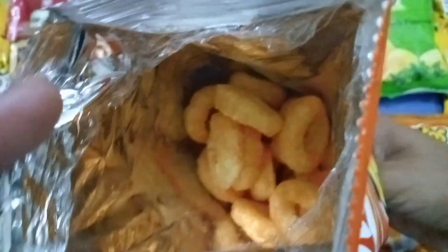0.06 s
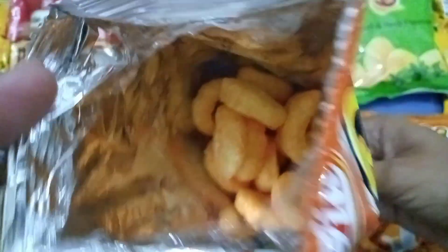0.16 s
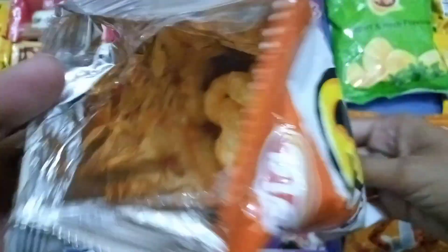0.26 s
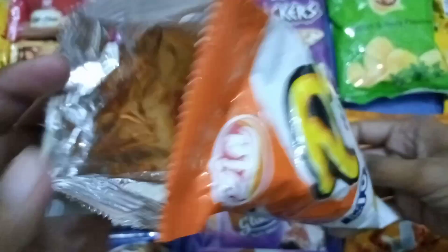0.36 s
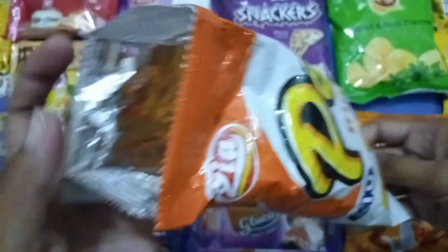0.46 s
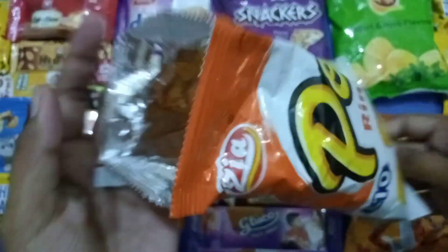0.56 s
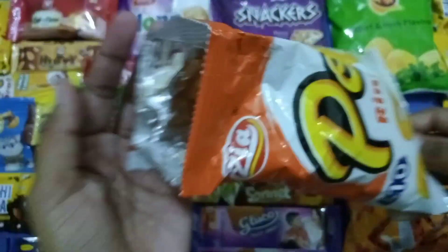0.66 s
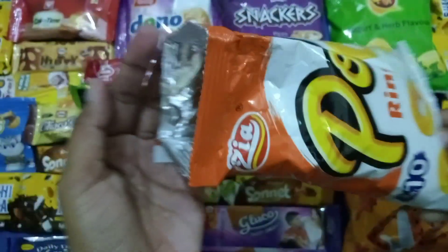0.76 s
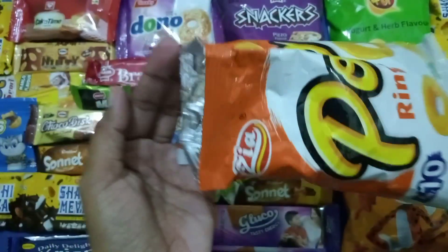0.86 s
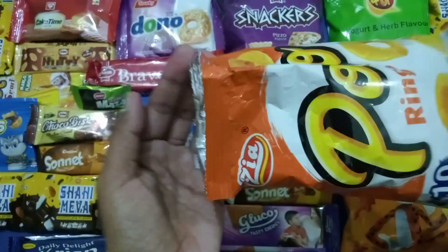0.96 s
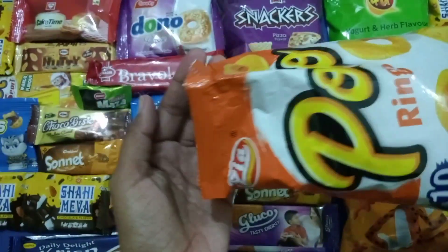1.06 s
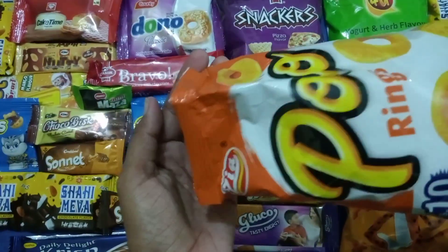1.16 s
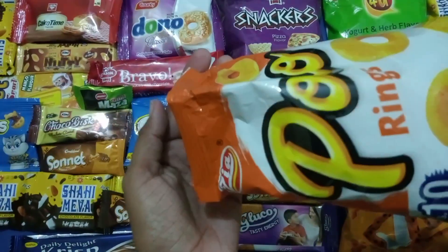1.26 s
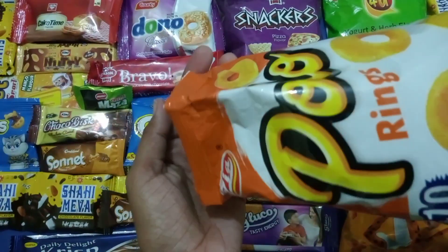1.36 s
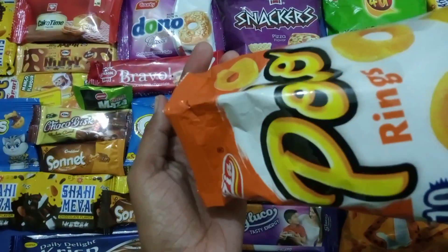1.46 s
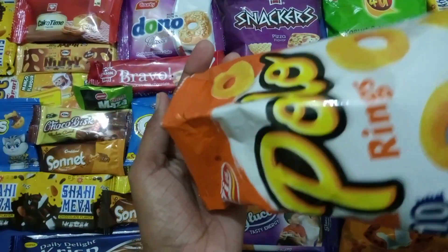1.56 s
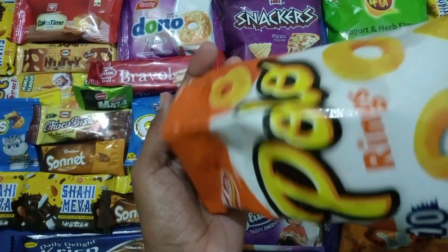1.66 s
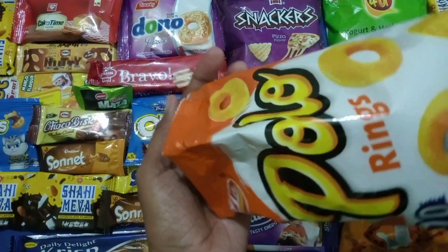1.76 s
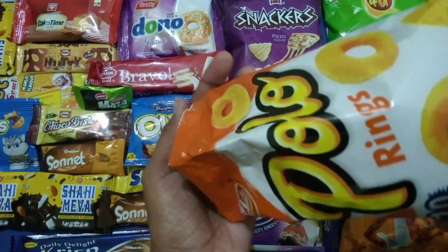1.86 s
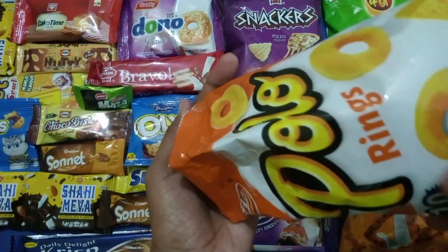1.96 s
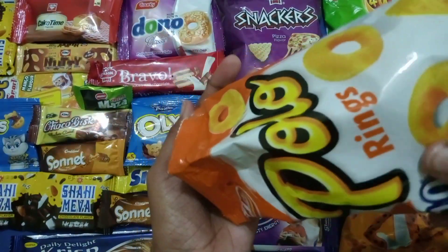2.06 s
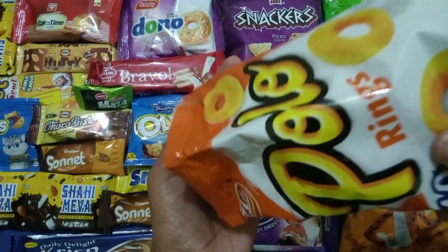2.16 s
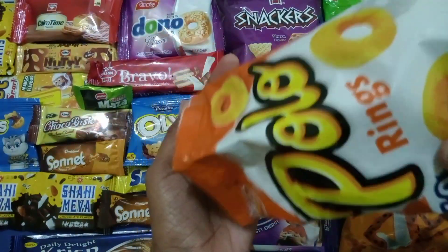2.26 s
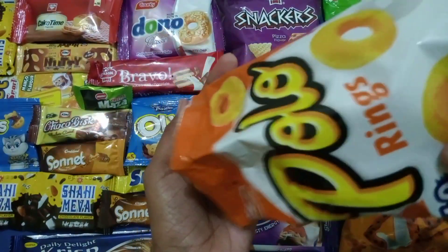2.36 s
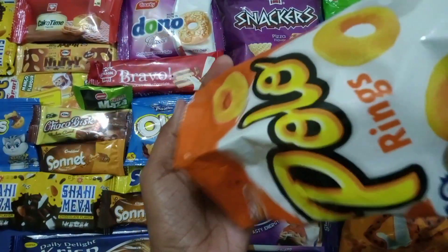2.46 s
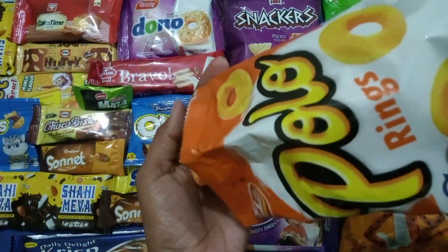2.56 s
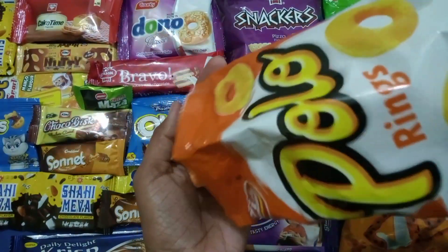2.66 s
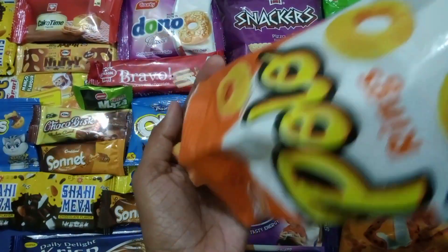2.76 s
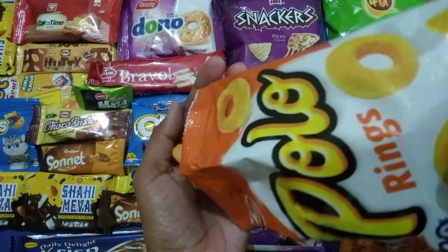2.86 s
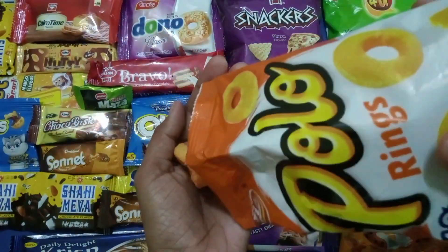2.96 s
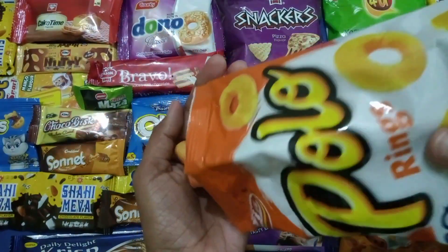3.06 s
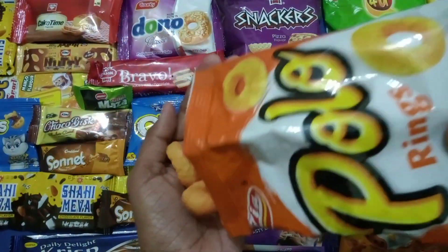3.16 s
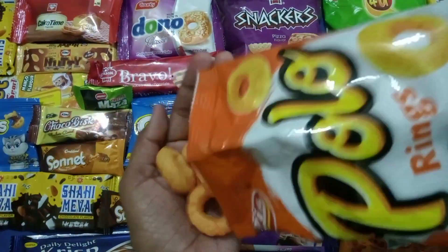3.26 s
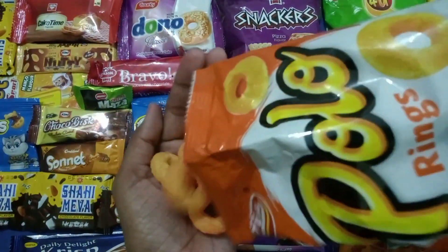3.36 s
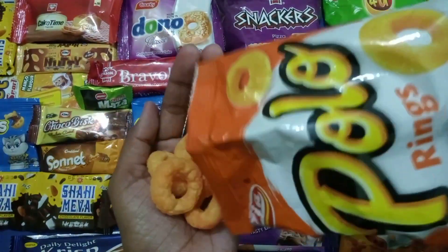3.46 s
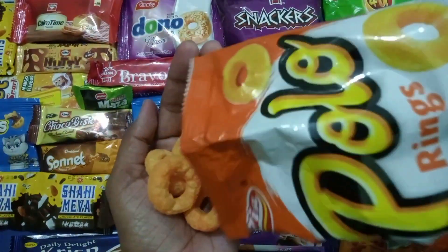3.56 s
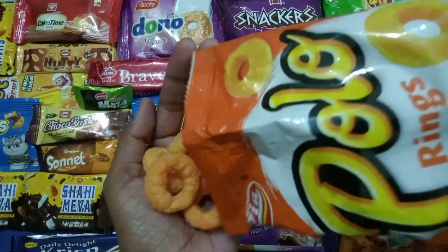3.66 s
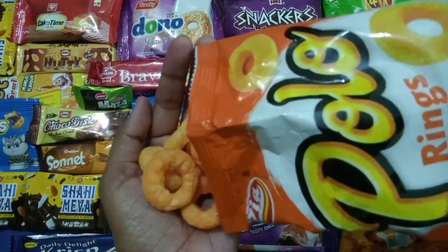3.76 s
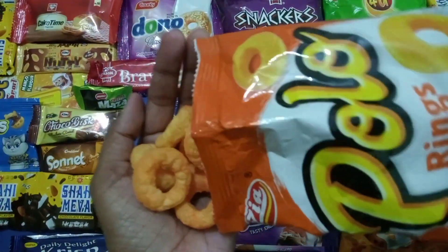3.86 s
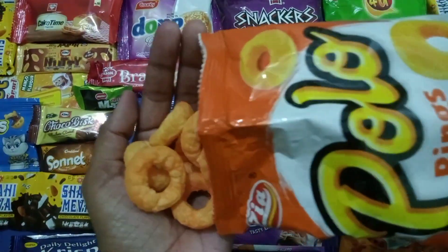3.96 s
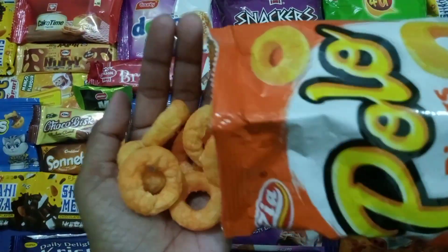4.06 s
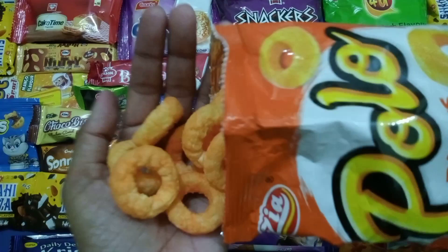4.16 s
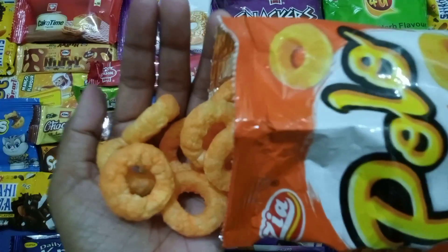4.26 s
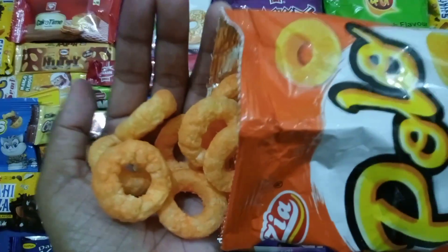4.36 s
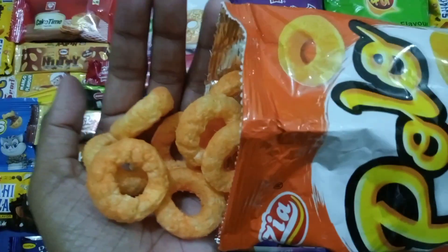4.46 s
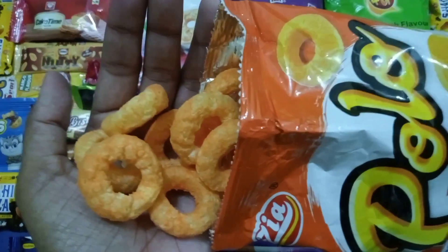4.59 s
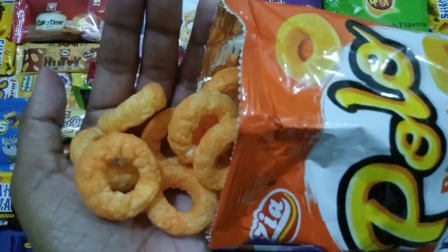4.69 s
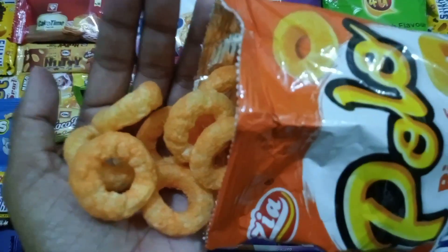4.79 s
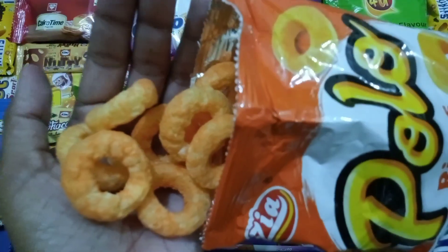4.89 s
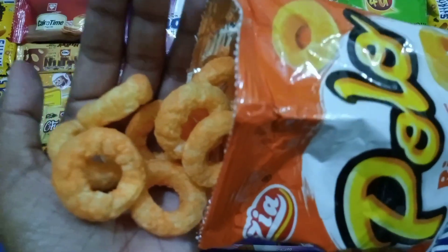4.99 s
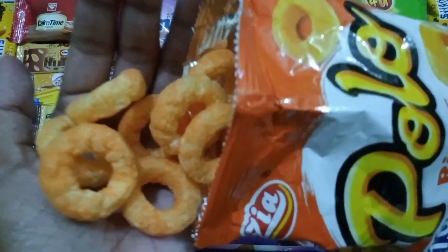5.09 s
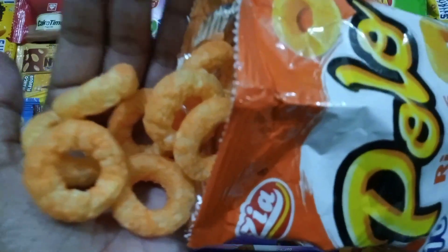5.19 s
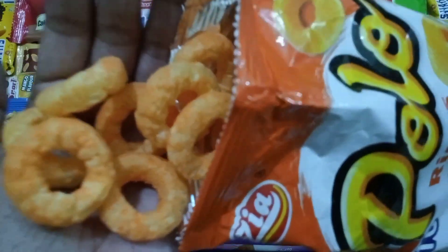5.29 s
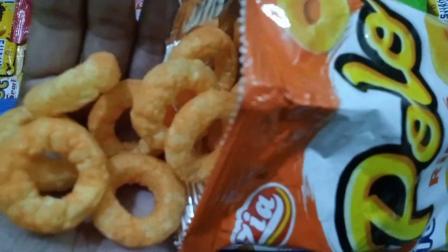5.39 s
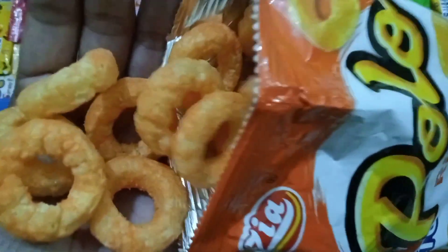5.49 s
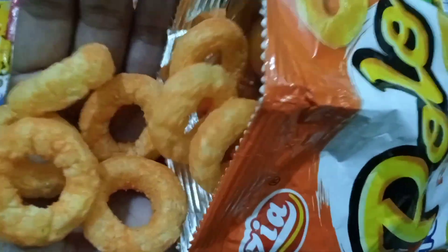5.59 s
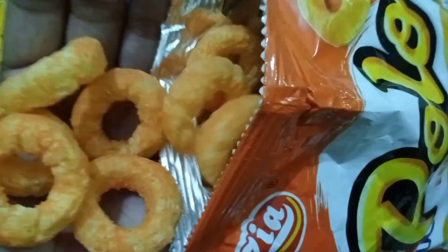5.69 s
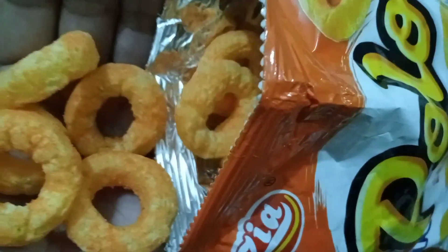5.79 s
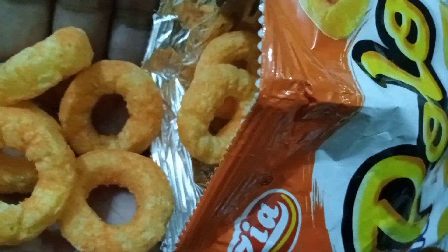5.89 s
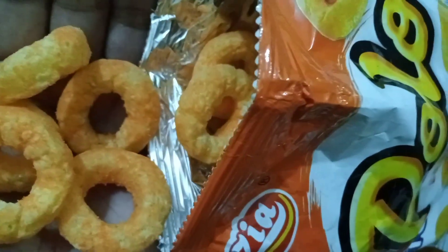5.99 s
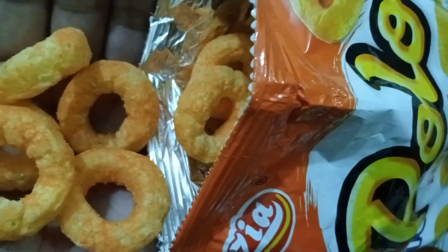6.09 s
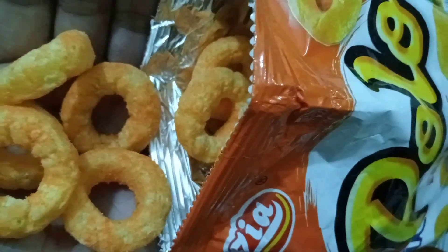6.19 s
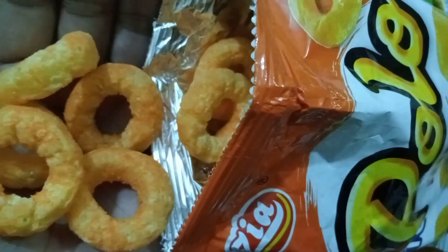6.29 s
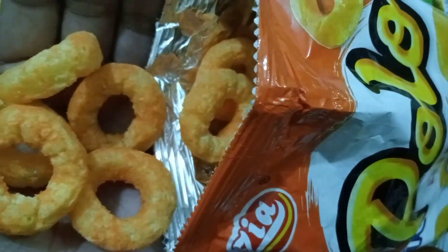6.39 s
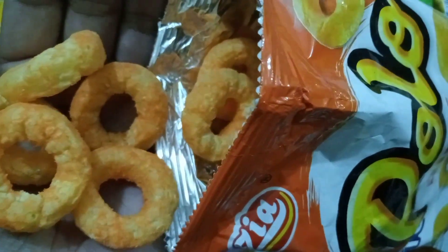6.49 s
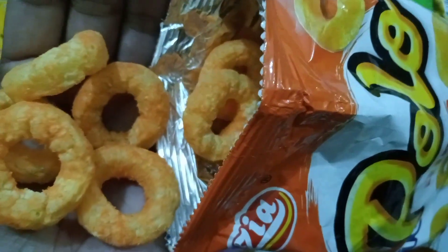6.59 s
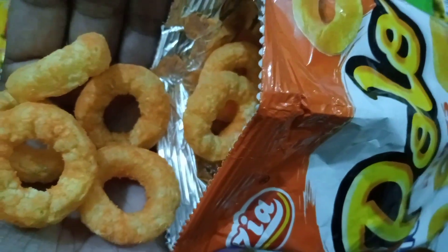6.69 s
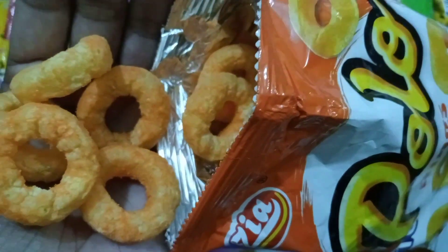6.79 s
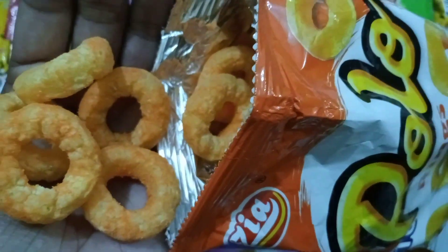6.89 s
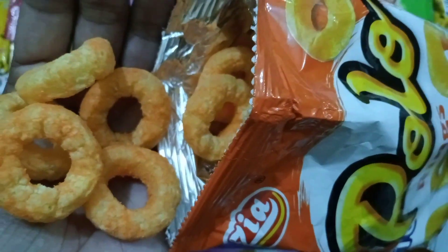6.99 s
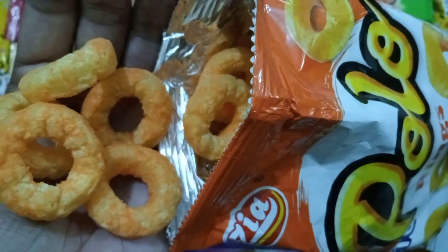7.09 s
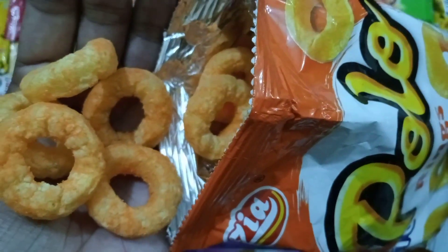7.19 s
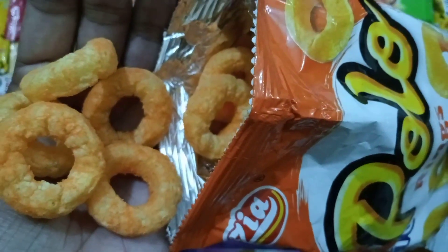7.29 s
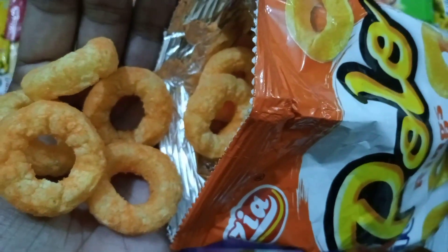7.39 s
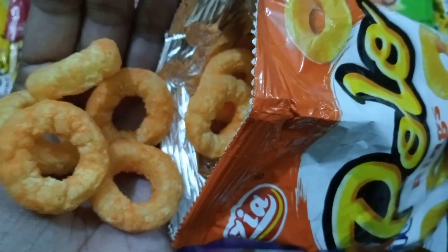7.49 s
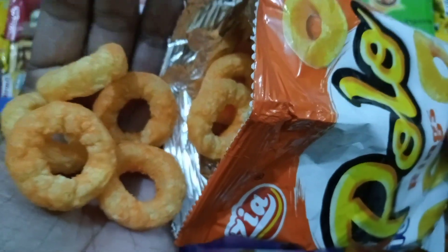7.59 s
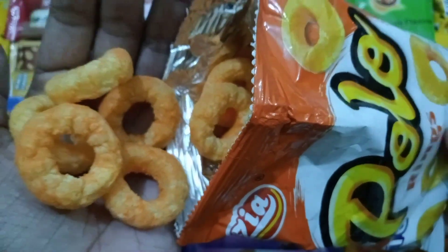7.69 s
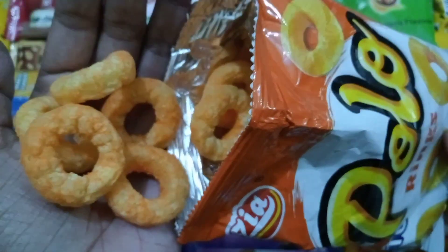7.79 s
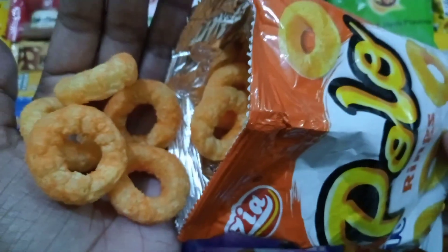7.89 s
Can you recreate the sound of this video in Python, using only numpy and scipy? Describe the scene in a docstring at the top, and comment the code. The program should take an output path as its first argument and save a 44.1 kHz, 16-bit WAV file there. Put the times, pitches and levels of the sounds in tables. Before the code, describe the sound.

Hands crinkle and shake a foil-lined snack packet close by, sharp film snaps and crackles thickening, then thinning into a soft slide over low room rumble.

```python
"""Over a faint rumble and drone, hands work a foil-lined snack packet close by in a small room.
Small folds crackle over a fine crinkle, then creases snap as the film buckles; the hollow pouch colours them.
Each squeeze builds, holds and lets go, driving the crinkle and a soft rumble of skin; early on a low hum swells.
Film and corn rings then hiss as they slide, briefly at first; two faint squeaks follow, and a longer slide.
Snaps are noise bursts through resonances, crinkle is many decaying sines, the hum is a filtered pulse train."""
import sys
import numpy as np
from scipy import signal
from scipy.fft import rfft, irfft
from scipy.io import wavfile
from scipy.ndimage import map_coordinates

SR = 44100
rng = np.random.default_rng(int(sys.argv[2]) if len(sys.argv) > 2 else 0)


def master(y):
    """Save y as 16-bit WAV."""
    cut = np.clip(np.atleast_2d(y).T, -1, 1)
    pcm = np.round(cut * 32767)  # scale
    wavfile.write(sys.argv[1], SR, pcm.astype(np.int16))


N = 350154

# room's low rumble and drone, gain over time: [t/s, level/dB]
RUMBLE_GAIN = [(.15, -7), (.35, -4), (5.1, 3), (6.25, -1), (7.1, 1.5), (7.33, -5.5), (7.55, 4.5)]
# spectral shape of the steady background: [f/Hz, relative density/dB per Hz]
FLOOR_SPECTRUM = [(20, -22), (65, 5), (95, -4.5), (140, 8), (220, -3.5), (600, -8), (1400, -19),
                  (2300, -13), (3600, -16), (6000, -33.5), (8200, -36), (9500, -28), (11500, -38),
                  (16000, -38.5)]
# partials of the wavering drone: [mean f/Hz, relative level/dB]
DRONE_PARTIALS = [(68, -75.5), (130, -77), (175, -78)]
# light handling between squeezes: [t/s, relative level/dB]
GRIP_LEVEL = [(.14, -93), (.28, -60.5), (1.1, -60), (1.6, -59), (2.7, -53.5), (3.9, -51.5), (4.45, -73),
              (5.5, -73.5), (5.68, -57.5), (5.88, -56.5), (6.22, -89.5)]
# squeezes and shakes: [start t/s, length t/s, relative crinkle level/dB, relative skin rumble level/dB]
SQUEEZE_EVENTS = [(0.319, 0.08, -47.5, -51.5), (0.462, .13, -46.5, -80), (0.745, 0.12, -53, -59.5),
                  (1.377, 0.039, -50, -55.5), (1.489, 0.14, -49.5, -49), (1.718, 0.15, -48.5, -68),
                  (2.147, 0.069, -37.5, -50), (2.375, 0.064, -39, -51), (2.561, 0.1, -44, -53),
                  (2.875, 0.045, -38, -45), (3.123, 0.12, -41.5, -46), (3.402, .21, -46.5, -50.5),
                  (3.76, 0.05, -52.5, -49), (3.905, .06, -40.5, -46.5), (3.974, .02, -54, -46),
                  (4.266, 0.11, -55.5, -77), (4.54, 0.19, -63, -69), (5.357, 0.1, -61, -70),
                  (5.697, 0.12, -50, -54), (5.945, 0.045, -57, -48.5), (7.443, .15, -82.5, -66.5)]
# spectral shape of skin rubbing on the packet: [f/Hz, relative density/dB per Hz]
SKIN_SPECTRUM = [(20, -29.5), (60, -10), (95, -4.5), (150, -0.5), (230, -4), (450, -5), (900, -34.5),
                 (3000, -62)]
# spectral shape of the film: [f/Hz, relative density/dB per Hz]
FILM_SPECTRUM = [(55, -36.5), (150, -8), (550, -6.5), (780, 0.5), (1100, -6), (1500, -5.5), (1900, -1),
                 (2800, -4.5), (3900, -4), (5200, -14.5), (6800, -17), (8300, -14.5), (9600, -7.5),
                 (12000, -18.5), (16000, -26.5)]
# treble of the crinkle over time: [t/s, relative level/dB]
TREBLE_LEVEL = [(0.2, -6), (0.76, -31), (1.2, -10.5), (2.24, -11), (3.98, -20.5), (4.79, -13), (5.47, -9.5),
                (6.2, -22.5)]
# film sliding instead of buckling: [t/s, relative hiss gain/1]
SLIDE_GAIN = [(2.85, .39), (2.9, 1.4), (2.98, .39), (5.5, 0.39), (5.62, 1.5), (5.97, 0.9)]
# small folds that give way facet by facet: [t/s, relative level/dB]
FOLD_EVENTS = [(0.2034, -55), (0.2442, -53.5), (0.289, -44), (0.3125, -36), (0.3866, -38), (0.4155, -45),
               (0.4592, -48), (0.4896, -41), (0.6413, -47), (0.736, -48), (0.7634, -46), (0.8495, -46),
               (1.2096, -43.5), (1.4215, -45), (1.744, -40), (1.8261, -45), (1.9289, -39), (1.947, -38.5),
               (2.1371, -31), (2.1555, -34.5), (2.1684, -35.5), (2.1797, -33), (2.1896, -32),
               (2.2849, -39.5), (2.357, -43), (2.3828, -39.5), (2.4224, -32.5), (2.5963, -47), (2.827, -44),
               (2.8479, -36), (2.8908, -45), (3.08, -33), (3.1043, -34.5), (3.1185, -42), (3.1502, -40),
               (3.163, -29.5), (3.176, -33), (3.1826, -30.5), (3.2014, -30), (3.221, -33), (3.2355, -31),
               (3.312, -43.5), (3.393, -35), (3.415, -37.5), (3.4536, -34.5), (3.4817, -49), (3.4961, -35),
               (3.5315, -36), (3.537, -34), (3.6214, -44), (3.6864, -42), (3.8264, -45.5), (3.8737, -40.5),
               (3.8863, -40), (3.9006, -40), (3.9313, -31), (3.953, -36), (3.9601, -32), (4.0037, -43.5),
               (4.0922, -40.5), (4.1441, -51.5), (4.836, -41), (5.1192, -54.5), (5.2243, -53.5),
               (5.3625, -42.5), (5.719, -67), (5.7498, -43.5), (5.955, -44.5), (6.1457, -57.5),
               (7.869, -45.5)]
# buckling creases: [t/s, relative level/dB, panel f/Hz, relative pouch level/dB, relative tick level/dB]
CREASE_EVENTS = [(0.335, -33, 2526, -4.5, -10), (0.3584, -29, 2367, -12, -1), (0.515, -31, 2960, -17, 6.5),
                 (0.532, -35, 2914, -6.5, -5), (0.5715, -35, 2360, -2.5, -29),
                 (0.602, -41, 2900, -2.5, -33), (0.723, -43.5, 3950, -13, -8), (0.831, -63, 2640, -4, 18.5),
                 (0.9401, -38.5, 2800, 3, -19.5), (1.0092, -42.5, 3260, -12, 0.5),
                 (1.1614, -45.5, 3150, -12, 1.5), (1.2207, -28, 3280, -13.5, -6),
                 (1.4398, -33, 3600, -12, -13), (1.5011, -30, 3000, -6.5, -12),
                 (1.5391, -44.5, 2280, 4, -26), (1.6336, -33.5, 2420, 0.5, -24),
                 (1.6453, -40.5, 2180, 4, -33), (1.7927, -35, 2630, -7, -2.5),
                 (1.8611, -33, 2750, -4.5, -3.5), (1.8668, -32, 3270, 1, -11),
                 (1.9904, -32.5, 2450, -10, -28), (2.0497, -43.5, 2280, 4, -23),
                 (2.0789, -24, 2620, -15.5, -14), (2.1314, -32, 2600, -2.5, -27),
                 (2.1492, -32, 2222, -0.5, -33), (2.2046, -25, 2950, -5, -12),
                 (2.217, -28, 2310, -11, -3.5), (2.488, -29, 2860, 2, -15.5),
                 (2.523, -38, 2890.0, 3.5, -11), (2.633, -24.5, 3130, -13, -5.5),
                 (2.8307, -30.5, 2520, -3.5, 2), (2.8401, -33, 3370, -10, -2), (2.933, -34, 1900, 2, -6.5),
                 (3.0544, -30, 2270, -3, -12), (3.0704, -28.5, 1740, -5, -13.5),
                 (3.214, -23.5, 2730, -14.5, -12), (3.2421, -31.5, 3140, -3.5, -1.5),
                 (3.36, -35.5, 2420, -2, -14), (3.37, -35.5, 3050, -13, -11), (3.73, -38.5, 2570, -11, -10),
                 (3.786, -40.5, 2900, -0.5, 1.5), (3.919, -32.5, 2468, -12, -5),
                 (3.9791, -33.5, 2880, -0.5, -2.5), (4.0616, -36, 2460, 3, -9.5),
                 (4.2494, -35, 3400, -7.5, -6.5), (4.316, -41, 2070, 0.5, -31),
                 (4.523, -40.5, 2950, -3, -24), (4.654, -42, 2460, -3, -22), (4.8237, -39, 2380, -1, -1.5),
                 (4.871, -49.5, 4020, -7.5, -5), (5.0142, -46.5, 2300, -14.5, -20),
                 (5.409, -44.5, 2180, 0.5, -20), (5.95, -46, 2810, 0, -0.5), (5.9932, -54, 2075, 9, -11),
                 (6.04, -46, 2140, 5.5, -15), (6.0509, -41.5, 2400, -16, -14.5),
                 (6.9754, -55, 3620, -8.5, -12), (7.1348, -65, 2980.0, -11.5, -3),
                 (7.3534, -54, 2200, -3, -28), (7.8743, -32.5, 2540, -4, -7), (7.8893, -41, 3270, -2, -9)]
# reverberation of the small room: [f/Hz, time to fall 60 dB t/s]
ROOM_DECAY = [(150, 0.28), (800, 0.45), (3000, 0.53), (9000, 0.4), (15000, 0.88)]
# gliding squeaks: [start t/s, held length t/s, first f/Hz, last f/Hz, amplitude level/dB]
SQUEAK_EVENTS = [(4.37, .05, 3850, 3800, -68.5), (4.59, .058, 3780, 4010, -65)]

TOP_HZ, RUMBLE_HZ = 16000, 260  # upper band limit; edge between rumble and hiss
TIGHTEN_DB_PER_S, RELAX_DB_PER_S = 354.5, 167.5  # how fast a squeeze builds and lets go
POUCH_HZ, TICK_HZ = 1300, 5500  # edges between pouch, panel and tick
UNEVEN_DB = 2.6  # quick unevenness of the fingers' effort
POUCH_LIFE_S, PANEL_LIFE_S, TICK_LIFE_S = 0.001, 0.0007, 0.0005  # decay constants of the crinkle's grains
PANEL_SLIDE_DB = -1  # sliding hiss under the panel's facets
CREASE_SPREAD_DB = 4.5  # scatter of tiny facets in each part of their colour
MINOR_DB, MINOR_SPREAD_DB = -2, 2  # faint crackles: offset from the film's flex, and scatter
FACET_GAP_S, FACET_LOSS_DB = 0.0012, 4  # mean wait and level loss from one flip to the next
HOLLOW_HZ, FACET_HZ, CREASE_HZ = 480, 2800, 9500  # usual pitches: hollow behind a fold, facet, crease tick
FOLD_PITCH_SPREAD = .33  # log scatter of a fold's pitches
FACET_POUCH_DB, FACET_TICK_DB = 6, -6  # mean pouch and tick of a facet re the film's colour
FOLD_POUCH_SPREAD_DB, FOLD_TICK_SPREAD_DB = 3, 2.5  # how folds differ in body and bite
LEAD = 256  # samples of creak before a flip
PANEL_SPLASH, PANEL_Q = 0.2, 8  # a panel's broad share beside its modes; their sharpness
CAVITY_Q = 10  # sharpness of the pouch's air resonance
SLIP_S, SLIP_GROWTH = 0.0017, 0.079  # slip time scale at 0 dB of pouch; its log growth per dB: big creases are slow
HUM_START_S, HUM_LENGTH_S, HUM_DB = 1.49, 0.27, -42  # the hum at full strength
HUM_HZ, HUM_DROP_HZ, HUM_GLIDE_S = 71.3, 22.44, 0.156  # mean final rate; initial excess; glide ending at the start
JUDDER_DB = 4  # unevenness of the hum's pulses


def amp(db):
    """Logarithmic level: decibels become an amplitude ratio."""
    return 10 ** (np.asarray(db) / 20)


def unit(x):
    """Normalization by power: x scaled to rms 1."""
    return x / np.sqrt(np.mean(x ** 2) + 1e-20)


def along(points, hz):
    """Interpolation on a logarithmic frequency axis through (Hz, value) points."""
    f, v = np.transpose(points)
    return np.interp(np.log(hz + 1), np.log(f), v)


def curve(rows):
    """Linear interpolation in time: (s, value) rows as one value per sample."""
    return np.interp(np.arange(N) / SR, *np.transpose(rows))


def wobble(rate):
    """Band-limited fluctuation: a smooth curve through rate random knots a second."""
    knots = rng.standard_normal(int(N * rate / SR) + 4)
    return map_coordinates(knots, [np.arange(N) * rate / SR])


def coloured(x, gain, size=2048):
    """Minimum-phase filtering: x through the causal filter whose magnitude is gain(Hz)."""
    magnitude = np.maximum(gain(np.fft.rfftfreq(size, 1 / SR)), 1e-6)
    cepstrum = irfft(np.log(magnitude))
    # folding the cepstrum forward in time makes the response causal
    cepstrum[1:size // 2] *= 2
    cepstrum[size // 2 + 1:] = 0
    response = irfft(np.exp(rfft(cepstrum)))
    return signal.oaconvolve(x, response)[:len(x)]


def below(hz, edge_hz, order=6):
    """Butterworth low-pass magnitude."""
    return 1 / np.sqrt(1 + (hz / edge_hz) ** (2 * order))


def peak(hz, centre_hz, q):
    """Simple resonance: magnitude near 1 at its centre, narrower for larger q."""
    return 1 / np.sqrt(1 + (q * (hz / centre_hz - centre_hz / (hz + 1))) ** 2)


def swell(start, length, rise, fall):
    """Exponential growth and decay: rise dB/s up to start, a hold of length seconds, then fall dB/s."""
    t = np.arange(N) / SR - start
    return amp(rise * np.minimum(t, 0) - fall * np.maximum(t - length, 0))


def background():
    """Stationary noise and slow modulation: rumble and drone swell together over microphone hiss."""
    drone = np.zeros(N)
    for hz, db in DRONE_PARTIALS:
        level = amp(db + 2.5 * wobble(4))
        wavering_hz = hz * (1 + 0.07 * wobble(2))
        drone += level * np.sin(2 * np.pi * np.cumsum(wavering_hz) / SR)
    noise = coloured(rng.standard_normal(N), lambda hz: amp(along(FLOOR_SPECTRUM, hz)))
    steady = amp(-70.0) * unit(noise)
    rumble = irfft(rfft(steady) * below(np.fft.rfftfreq(N, 1 / SR), RUMBLE_HZ), N)
    hiss = steady - rumble
    return amp(curve(RUMBLE_GAIN)) * (drone + rumble) + hiss


def working():
    """Addition of powers: a light grip plus the squeezes flex the film and rub skin on it."""
    flex_power = amp(curve(GRIP_LEVEL)) ** 2
    rub_power = flex_power.copy()
    for start, length, crinkle_db, rumble_db in SQUEEZE_EVENTS:
        power = swell(start, length, TIGHTEN_DB_PER_S, RELAX_DB_PER_S) ** 2
        flex_power += amp(crinkle_db) ** 2 * power
        rub_power += amp(rumble_db) ** 2 * power
    return np.sqrt(flex_power), np.sqrt(rub_power)


def hands(pressure):
    """Frictional noise: dull uneven rubbing of skin, scaled by pressure."""
    rub = unit(coloured(rng.standard_normal(N), lambda hz: amp(along(SKIN_SPECTRUM, hz))))
    return pressure * amp(-3.5 + 2.8 * wobble(33)) * rub


def film(hz):
    """Spectral division of the film's colour: hollow pouch, ringing panel, sharp tick of the crease."""
    low, high = below(hz, POUCH_HZ) ** 2, below(hz, TICK_HZ) ** 2
    return amp(along(FILM_SPECTRUM, hz)) * np.sqrt([low, (1 - low) * high, 1 - high])


def grains(starts, sizes, centre_hz, spread, life, size=320):
    """Damped free vibration: tiny facets of film ring briefly, each at its own pitch and strength."""
    t = np.arange(size) / SR
    scatter = np.exp(spread * rng.standard_normal((len(starts), 1)))
    hz = np.minimum(centre_hz * scatter, TOP_HZ)
    strength = sizes[:, None] * amp(CREASE_SPREAD_DB * rng.standard_normal(hz.shape))
    polarity = rng.choice([-1, 1], hz.shape)
    rings = strength * polarity * np.sin(2 * np.pi * hz * t) * np.exp(-t / life)
    places = starts[:, None] + np.arange(size)
    return unit(np.bincount(places.ravel(), rings.ravel(), N)[:N])


def crinkle(flex, count=1900, order=3):
    """Random superposition: small creases flip a few facets over the hiss of sliding film and rings."""
    effort = flex * amp(-3.6 + UNEVEN_DB * wobble(110))
    crease_starts = rng.uniform(0, N, (count, 1))
    delays = rng.exponential(0.00088 * SR, (count, order))
    starts = (crease_starts + delays).astype(int).ravel()
    sizes = np.repeat(amp(6.3 * np.minimum(rng.exponential(size=count), 2.6)), order)

    def part(channel, facets, slide_db):
        """Power-weighted mixing of facets and sliding hiss in one part of the film's colour."""
        hiss = amp(slide_db) * curve(SLIDE_GAIN)
        tint = lambda x: unit(coloured(x, lambda hz: film(hz)[channel]))
        return (tint(facets) + hiss * tint(rng.standard_normal(N))) / np.hypot(1, hiss)

    pouch_facets = grains(starts, sizes, centre_hz=667.5, spread=0.45, life=POUCH_LIFE_S)
    pouch = part(0, pouch_facets, slide_db=4.5)
    panel_facets = grains(starts, sizes, centre_hz=2950, spread=.4, life=PANEL_LIFE_S)
    panel = part(1, panel_facets, slide_db=PANEL_SLIDE_DB)
    tick_facets = grains(starts, sizes, centre_hz=9600, spread=0.34, life=TICK_LIFE_S)
    tick = part(2, tick_facets, slide_db=5.0)
    return effort * (amp(-2.5) * pouch + amp(-1.5) * panel + amp(curve(TREBLE_LEVEL) + 3.0) * tick)


def crackle(count=4, size=1024):
    """Successive buckling: a quick run of ever weaker flips, close in pitch, in one fold's body and bite."""
    t, out, start = np.arange(size) / SR, np.zeros(size), 0
    pitch_scatter = np.exp(FOLD_PITCH_SPREAD * rng.standard_normal(3))
    hollow_hz, fold_hz, crease_hz = np.array([HOLLOW_HZ, FACET_HZ, CREASE_HZ]) * pitch_scatter
    body = amp(FACET_POUCH_DB + FOLD_POUCH_SPREAD_DB * rng.standard_normal())
    bite = amp(FACET_TICK_DB + FOLD_TICK_SPREAD_DB * rng.standard_normal())
    for k in range(count):
        detune = np.exp(.1 * rng.standard_normal())
        jolt = unit(rng.standard_normal(size) * np.exp(-t / 0.0005))

        def colour(hz):
            """Resonance of hollow, facet and crease, summed in magnitude."""
            pouch = body * (.5 + peak(hz, hollow_hz * detune, q=3.8))
            panel = .5 + 3 * peak(hz, fold_hz * detune, PANEL_Q)
            tick = bite * (.5 + 2 * peak(hz, crease_hz * detune, PANEL_Q))
            return np.sum(film(hz) * [pouch, panel, tick], axis=0)

        flip = unit(coloured(jolt, colour, size=512))
        out[start:] += amp(-FACET_LOSS_DB * k) * flip[:size - start]
        start += round(FACET_GAP_S * SR * (.5 + rng.random()))
    return unit(out)


def faint_crackles(flex, count=170):
    """Stochastic excitation: (s, dB) rows of crackles, denser and louder the harder the film is worked."""
    chance = np.cumsum(np.sqrt(flex))
    quantiles = (np.arange(count) + rng.random(count)) / count
    at = np.searchsorted(chance, chance[-1] * quantiles)
    db = 20 * np.log10(flex[at]) + MINOR_DB + MINOR_SPREAD_DB * rng.standard_normal(count)
    return np.transpose([at / SR, db])


def crackles(flex):
    """Linear superposition of all the small folds, clear and faint."""
    out = np.zeros(N + SR)
    for s, db in [*FOLD_EVENTS, *faint_crackles(flex)]:
        one = crackle()
        out[round(s * SR):][:len(one)] += amp(db - 6.5) * one
    return out[:N]


def snap(panel_hz, pouch_db, tick_db, slip, size=2048):
    """Snap-through buckling: a crease creaks and flips, heard straight ahead and broader into the room."""
    t = (np.arange(size) - LEAD) / SR
    slips = rng.standard_normal(size) * amp(3.87 * rng.standard_normal(size))
    slip = max(slip, 1e-4)
    # strain builds just before the flip
    creak = amp(-4.0) * np.exp(-abs(t) / (0.0005 + .5 * slip))
    run = slips * np.where(t < 0, creak, np.exp(-abs(t) / (1.72 * slip)))
    # the sheet shivers on after it
    flutter = rng.standard_normal(size) * np.exp(-abs(t) / 0.0074) * (t >= 0)
    drive = run / np.linalg.norm(run) + amp(-8.5) * flutter / np.linalg.norm(flutter)
    # quick flips have one strong clean jolt
    drive[LEAD] += rng.choice([-1, 1]) * 2.6 * np.exp(-slip / 0.00065)

    cavity_hz = 770 * np.exp(0.1 * rng.standard_normal())  # the pouch keeps changing shape
    crease_hz = CREASE_HZ * np.exp(0.17 * rng.standard_normal())
    other_hz = panel_hz * 2 ** rng.uniform(-1.1, 1)  # the panel's second mode
    modes = lambda hz: peak(hz, panel_hz, PANEL_Q) + .5 * peak(hz, other_hz, PANEL_Q)
    pouch = coloured(drive, lambda hz: film(hz)[0] * (13.0 + peak(hz, cavity_hz, CAVITY_Q)))
    panel = coloured(drive, lambda hz: film(hz)[1] * (PANEL_SPLASH + modes(hz)))
    tick = coloured(drive, lambda hz: film(hz)[2] * (2.0 + peak(hz, crease_hz, q=22)))
    # heard from all sides, no one resonance stands out
    impulse = 1.0 * (t == 0)
    broad = [unit(coloured(impulse, lambda hz: film(hz)[k])) for k in range(3)]
    shares = amp([pouch_db + 0.3, 0, tick_db - 3.14])
    return shares @ np.array([[unit(pouch), unit(panel), unit(tick)], broad])


def snaps():
    """Linear superposition of creases, each with its own panel: direct sound and sound sent into the room."""
    out = np.zeros((2, N + SR))
    for s, db, panel_hz, pouch_db, tick_db in CREASE_EVENTS:
        slip = SLIP_S * np.exp(SLIP_GROWTH * pouch_db)
        one = snap(panel_hz, pouch_db, tick_db, slip)
        start = round(s * SR) - LEAD
        out[:, start:start + one.shape[1]] += amp(db - 10.0) * one
    return out[:, :N]


def room(x):
    """Diffuse reverberation: a flickering noise tail that changes every half second as the packet moves."""
    hop = SR // 2
    padded, out = np.pad(x, (hop, 2 * hop)), np.zeros(N + 5 * hop)
    for start in range(0, N + hop, hop):
        hz, t, z = signal.stft(rng.standard_normal(hop), SR, nperseg=256)
        fall = amp(-60 * t / along(ROOM_DECAY, hz)[:, None]) * (1 - np.exp(-t / 0.001))
        tail = signal.istft(z * fall, SR, nperseg=256)[1]
        # overlapping triangles crossfade from tail to tail
        stretch = padded[start:start + 2 * hop] * np.bartlett(2 * hop)
        answer = signal.fftconvolve(stretch, tail / np.linalg.norm(tail))
        out[start:start + len(answer)] += answer
    return out[hop:hop + N] * amp(2 * wobble(130))


def hum():
    """Pulse excitation of a resonator: a low judder sinks to about seventy pulses a second."""
    early = np.clip((HUM_START_S - np.arange(N) / SR) / HUM_GLIDE_S, 0, 1)
    cycles = np.cumsum(HUM_HZ + HUM_DROP_HZ * early + 2.5 * wobble(25.09)) / SR
    pulses = np.diff(np.floor(cycles), prepend=0) * amp(JUDDER_DB * wobble(65))
    dull = lambda hz: peak(hz, 73, q=2.5) * below(hz, 300, order=3)
    tone = unit(coloured(pulses, dull, size=8192))
    return amp(HUM_DB) * swell(HUM_START_S, HUM_LENGTH_S, rise=150, fall=130) * tone


def squeaks():
    """Frequency glide: thin sliding tones, perhaps film dragging on film."""
    out = np.zeros(N)
    for start, length, first_hz, last_hz, db in SQUEAK_EVENTS:
        hz = curve([(start, first_hz), (start + length, last_hz)]) + 22 * wobble(300)
        tone = np.sin(2 * np.pi * np.cumsum(hz) / SR)
        out += amp(db) * swell(start, length, rise=870, fall=690) * tone
    return out


def scene(size=256):
    """Superposition and scattering: all is centred but the treble, which hands and room spread a little."""
    flex, pressure = working()
    buckling = flex / np.hypot(1, .5 * curve(SLIDE_GAIN))  # sliding film buckles less
    direct, radiated = snaps() + crackles(buckling) + crinkle(flex)
    mid = direct + amp(-9.0) * room(radiated) + hands(pressure) + squeaks() + hum() + background()
    scatter = unit(rng.standard_normal(size) * np.linspace(1, 0, size)) / np.sqrt(size)
    treble = coloured(mid, lambda hz: 1 - below(hz, 4900, order=12))
    side = amp(-12.5) * signal.oaconvolve(treble, scatter)[:N]
    return np.array([mid + side, mid - side])


def record(dry):
    """Band limitation: a steep low-pass leaves almost nothing above TOP_HZ."""
    return irfft(rfft(dry) * below(np.fft.rfftfreq(N, 1 / SR), TOP_HZ, order=70), N)


dry = scene()
out = record(dry)
master(out)
```